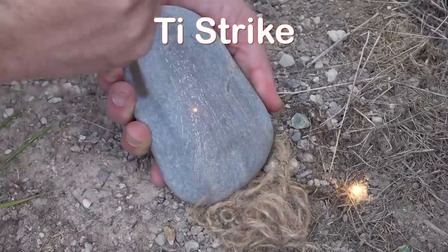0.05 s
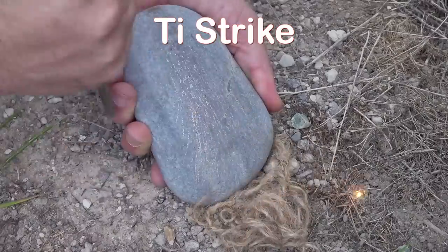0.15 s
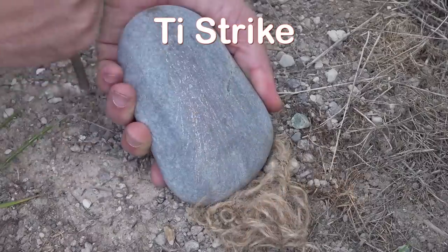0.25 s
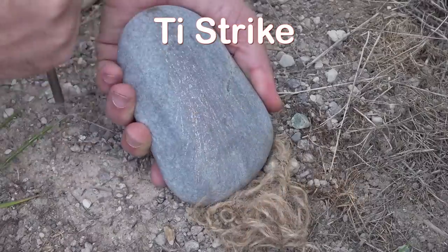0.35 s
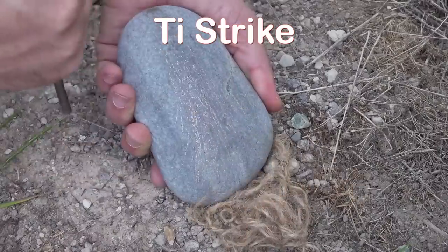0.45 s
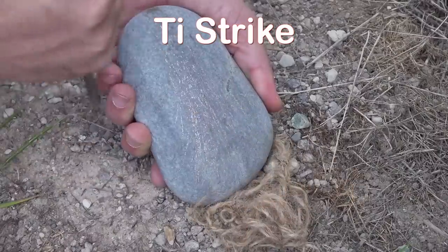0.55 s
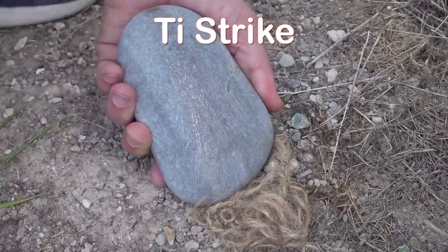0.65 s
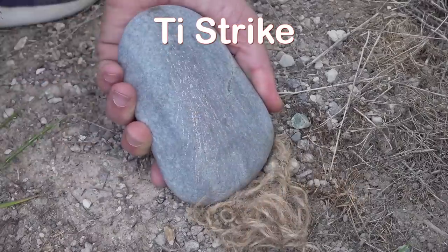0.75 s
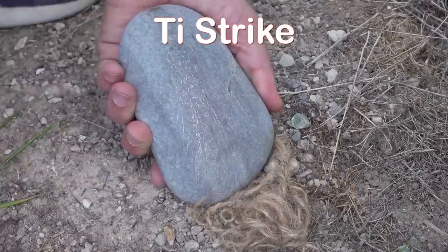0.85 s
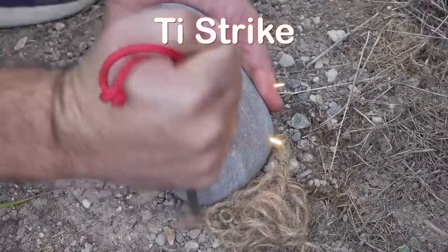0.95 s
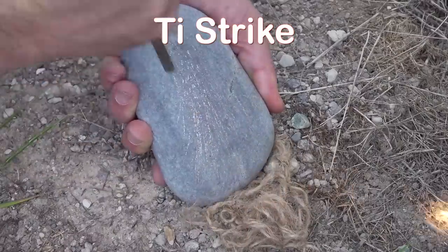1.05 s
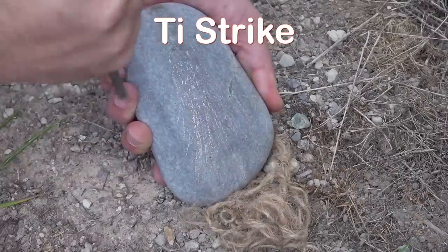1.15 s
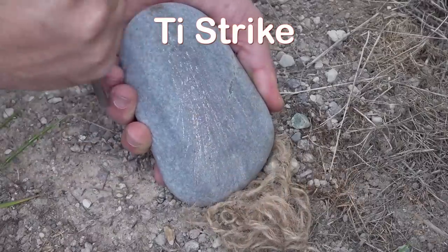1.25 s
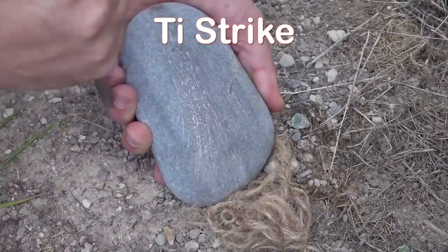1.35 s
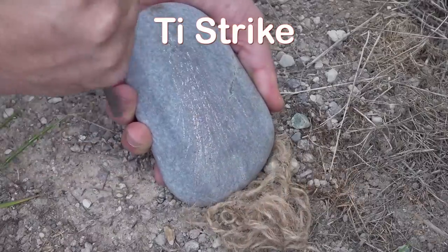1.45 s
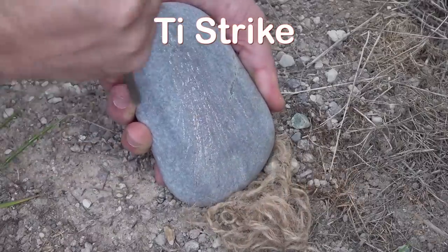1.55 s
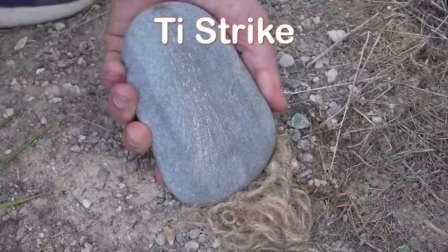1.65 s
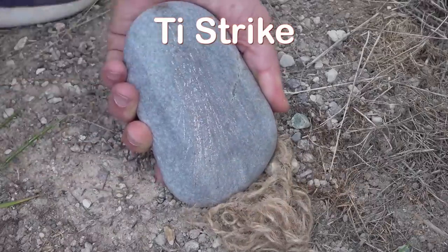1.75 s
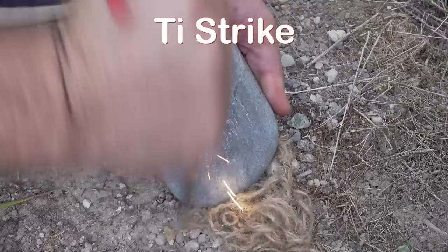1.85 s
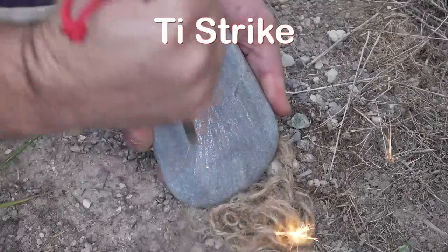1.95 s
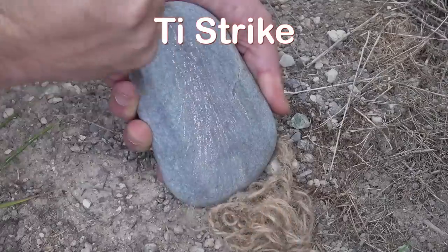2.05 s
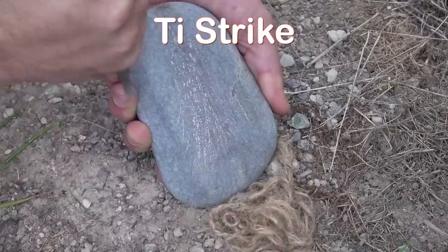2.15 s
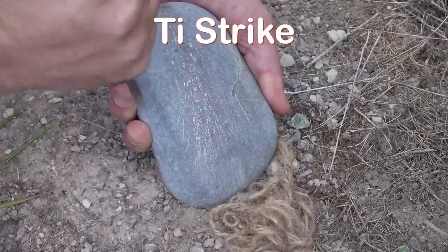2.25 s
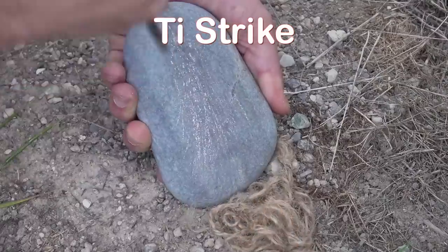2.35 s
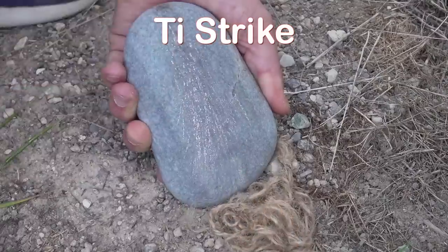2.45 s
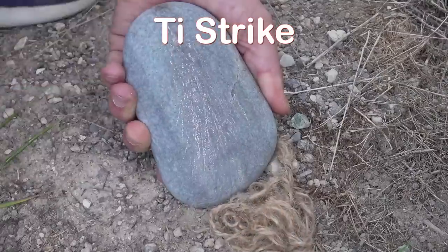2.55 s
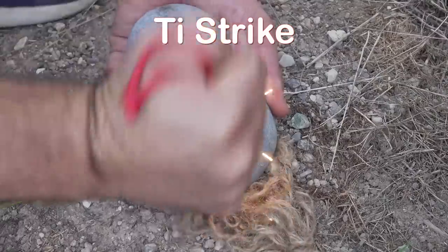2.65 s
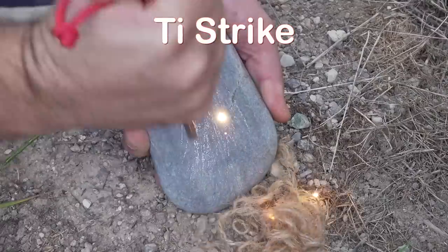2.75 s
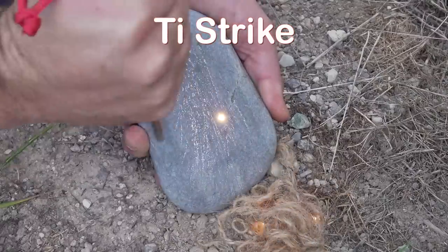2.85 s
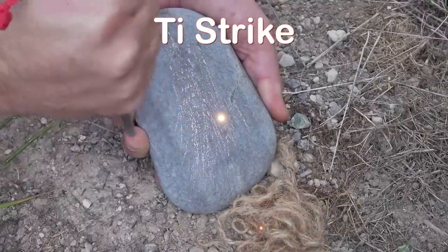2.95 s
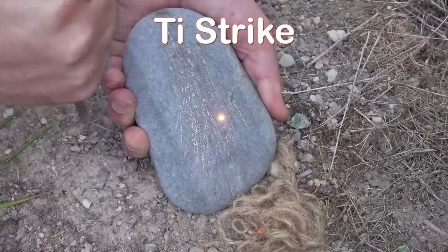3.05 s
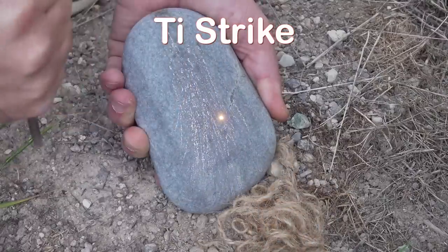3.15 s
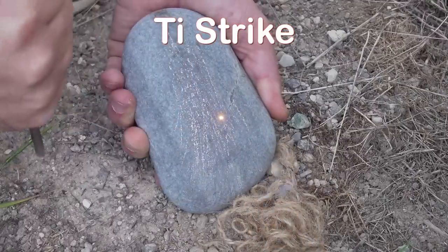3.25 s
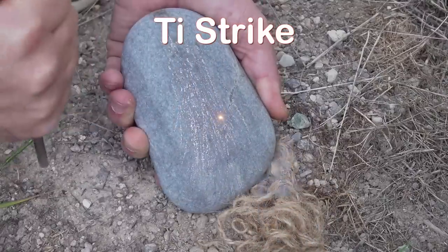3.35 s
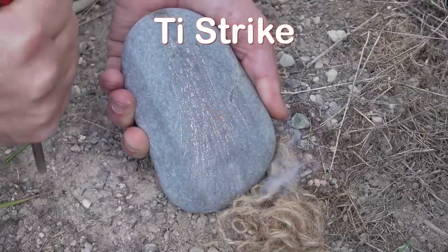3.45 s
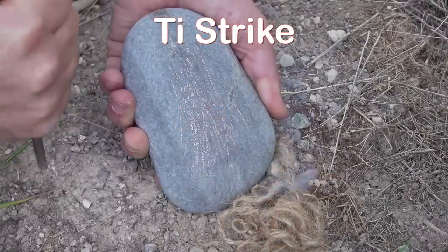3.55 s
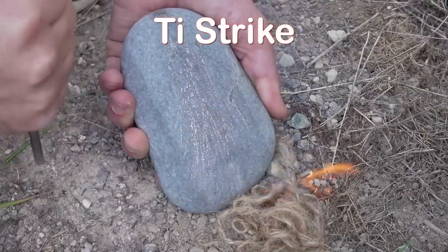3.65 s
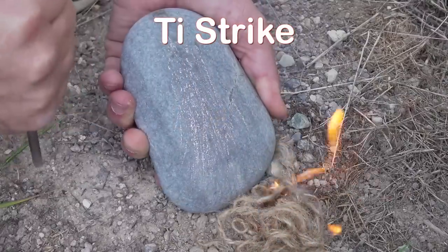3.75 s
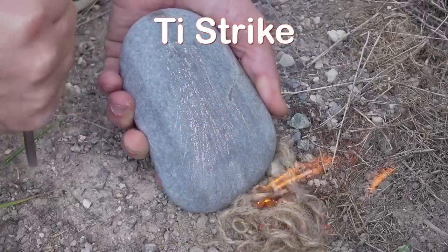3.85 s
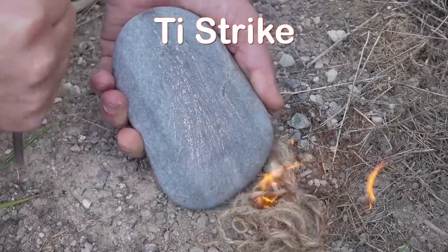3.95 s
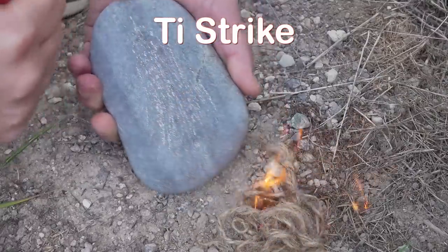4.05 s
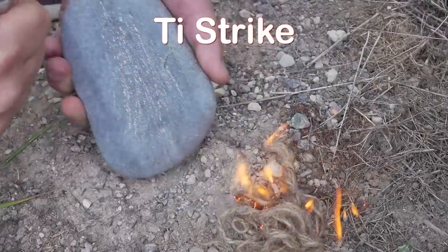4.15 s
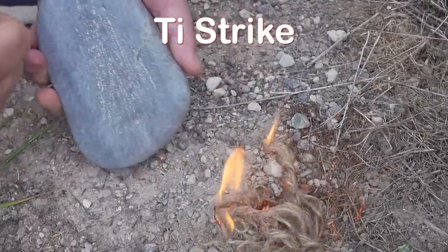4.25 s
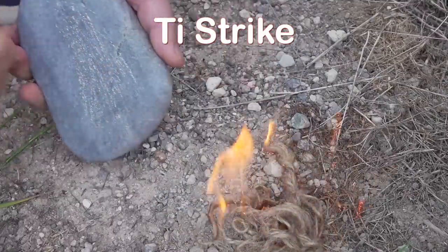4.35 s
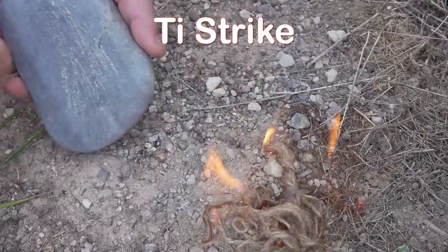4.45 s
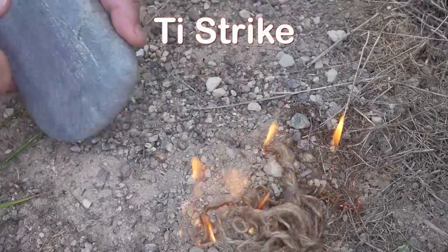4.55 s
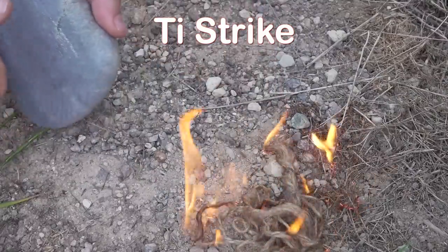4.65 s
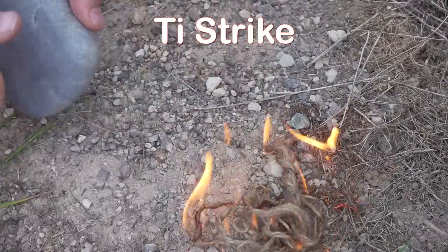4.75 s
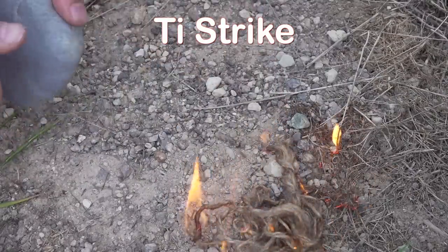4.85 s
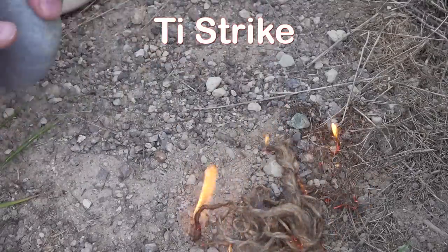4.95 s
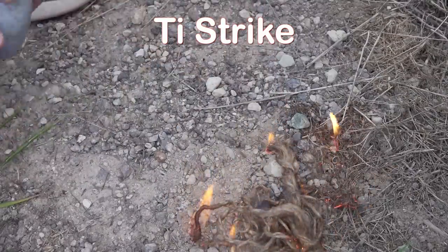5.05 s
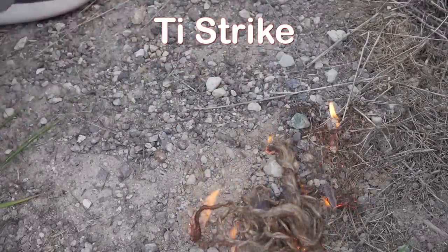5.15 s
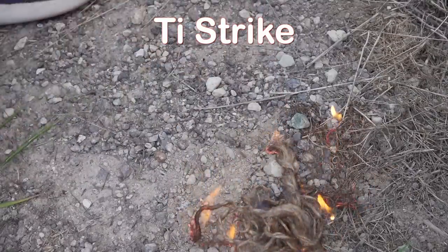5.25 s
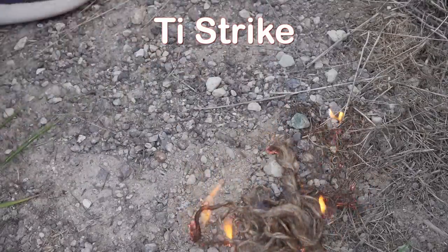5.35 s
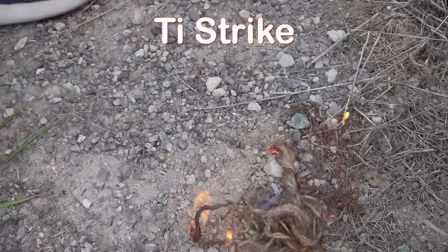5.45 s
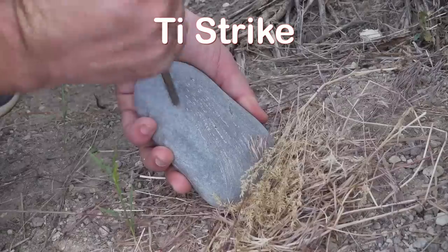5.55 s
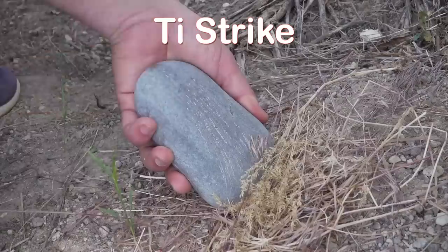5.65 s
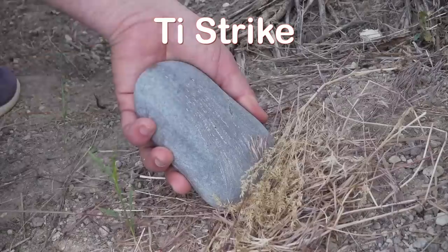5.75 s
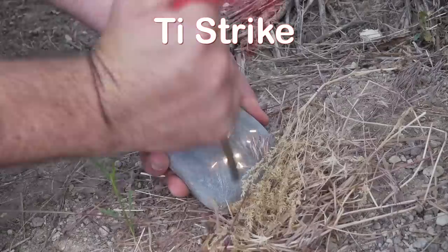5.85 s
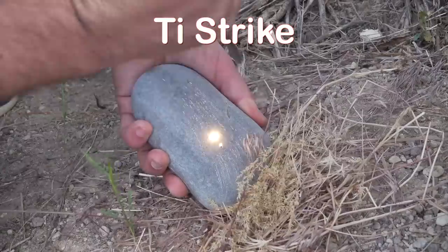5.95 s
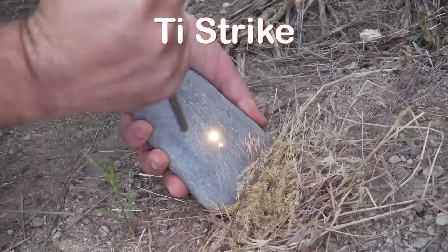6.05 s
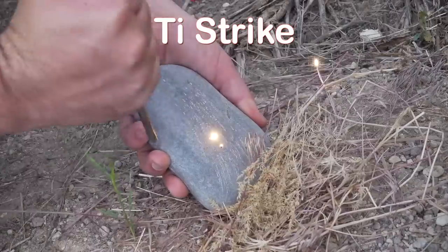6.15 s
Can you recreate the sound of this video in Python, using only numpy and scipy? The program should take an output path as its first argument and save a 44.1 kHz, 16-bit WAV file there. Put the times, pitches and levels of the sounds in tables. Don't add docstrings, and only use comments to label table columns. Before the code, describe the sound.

Close stereo microphone in open air, with faint hiss, a far traffic wash and low wind buffeting. Sharp, dry strikes of metal on stone are much louder than everything else, each fusing into a brief scratch with popping sparks. Between them come cloth rustles, gravel ticks and snapping dry fibre. After the third strike, wind and quiet handling fill a long pause; a distant engine cuts in before a weaker, higher final scrape.

```python
import sys
import numpy as np
from scipy import signal
from scipy.io import wavfile
from scipy.ndimage import uniform_filter1d

SR = 44100
rng = np.random.default_rng(int(sys.argv[2]) if len(sys.argv) > 2 else 0)


def natural_amplitude(level_db):
    exponent = np.asarray(level_db, float) / 20
    return 10 ** exponent


def unload_audio(sound):
    columns = np.transpose(np.atleast_2d(sound))
    steps = np.round(np.clip(columns, -1, 1) * 32767)
    wavfile.write(sys.argv[1], SR, steps.astype(np.int16))


N = 273217
TIME = np.arange(N) / SR


def evened(x):
    return x / np.sqrt(np.mean(x ** 2) + 1e-20)


def read(points, hz):
    f, value = np.transpose(points)
    return np.interp(np.log(hz + 1), np.log(f + 1), value)


def add(mix, start_s, sound):
    part = mix[:, round(start_s * SR):][:, :sound.shape[1]]
    part += sound[:, :part.shape[1]]


def sides(pan_db):
    return natural_amplitude(np.array([.5, -.5])[:, None] * pan_db)


def resonate(x, hz, width_hz):
    turn = np.exp(2j * np.pi * np.cumsum(hz * np.ones(x.shape[-1])) / SR)
    r = np.exp(-np.pi * width_hz / SR)
    return 2 * (turn * signal.lfilter([1 - r], [1, -r], x / turn)).real


# f/Hz, correlation
LIKENESS = [(60, 0.82), (130, 0.86), (290, 0.59), (640, 0.66), (1410, 0.72), (3100, 0.36), (6820, 0.05),
            (15000, -0.98)]


def noise(shape, patchy_db, flicker_db, likeness=1., tilt_db=None, size=512):
    hop, hz = size // 4, np.fft.rfftfreq(size, 1 / SR)
    frames = N // hop + 5
    a, b, c, d, patches = rng.standard_normal((frames, len(hz), 5)).T
    patches = evened(uniform_filter1d(uniform_filter1d(patches, size=8, axis=0), size=16, axis=1))
    flicker = evened(uniform_filter1d(rng.standard_normal(frames), size=3))
    same = np.clip(likeness * read(LIKENESS, hz), -1, 1)[:, None]
    left = a + 1j * b
    z = np.array([left, same * left + np.sqrt(1 - same ** 2) * (c + 1j * d)])
    z *= natural_amplitude(read(shape, hz)[:, None] + patchy_db * patches + flicker_db * flicker)
    z /= np.sqrt(np.mean(abs(z) ** 2))
    if tilt_db is not None:
        octaves = np.log2((hz + 100) / 2500)
        z *= natural_amplitude(np.outer(octaves, np.interp(np.arange(frames) * hop / SR, TIME, tilt_db)))
    return signal.istft(z, nperseg=size, noverlap=size - hop)[1][:, :N] / np.sqrt(size / 3)


BLOW_TIMES = [
    .9464,
    1.8853,
    2.6622,
    5.8893,
]
# peak level/dB, left-right/dB, tuning/factor, treble/dB, middle modes/dB
BLOWS = [
    (-0.5, 0, 1.02, 0.5, -7.5),
    (1.5, 0, 0.978, 0, -0.5),
    (0.5, -0.5, 0.984, 5, -4),
    (-2.5, -0.5, 1.05, -2.5, -7),
]
# level/dB, weak when hit near its node
NODE_DB = [
    0,
    0,
    1,
    -9,
]
# f/Hz, level/dB, t60/s
CLANG = [(1260, -10, 0.010), (1590, -13, 0.012), (2680, -10.5, 0.014), (4940, -4.5, 0.0056),
         (5220, -2, .010), (6003, -2, 0.0073), (7900, -8, 0.0083), (8760, -2.5, 0.006),
         (9950, -3.5, 0.00358), (11650, -12.5, .007), (13300, -13.5, 0.0078)]


def blow(start_s, peak_db, pan_db, tuning, treble_db, middle_db, node_db):
    t = np.arange(1500) / SR
    hz, db, t60_s = np.transpose(CLANG)[..., None]
    hz = hz * tuning * rng.uniform(0.97, 1.02, hz.shape)
    db = db + treble_db * (hz > 7000) + middle_db * (abs(hz - 3500) < 1400)
    db = db + node_db * (abs(hz - 6010) < 300)
    phase = rng.normal(0, 0.77, (2,) + hz.shape) * hz / 9000
    swell = 1 - np.exp(-t * hz / 0.96)
    ring = (swell * natural_amplitude(db - 60 * t / t60_s) * np.sin(2 * np.pi * hz * t + phase)).sum(1)
    contact = np.zeros(90)
    contact[[0, 9, 37, 62, 85]] = .25, .9, .25, -.25, .12
    clang = signal.fftconvolve(ring, contact[None], axes=1)
    return start_s, natural_amplitude(peak_db - 0.5) * sides(pan_db) * clang / abs(clang.mean(0)).max()


# landing pressure/dB, deepest bite t/s, bite pressure/dB, lift-off/(dB/s), treble/dB
STROKES = [
    (-30, 0.016, -21, 900, 4),
    (-22, .018, -20, 900, -1.5),
    (-27, 0.021, -21.5, 1300, -0.5),
    (-26.5, 0.023, -30.5, 1500, -7),
]
# factor before bite, at bite, lifting; low modes/dB; stone tuning/factor
GRIPS = [
    (1.03, 1.1, 1, -0.5, 1.05),
    (1.03, 1.1, 1.15, 2.5, 0.997),
    (1.06, 1.02, 1.075, 0.5, 1.096),
    (1.02, 0.95, 1.06, 2.5, 1.02),
]
# f/Hz, width/Hz, level/dB
ROD = [(3183, 800, -16.5), (4100, 560, -14.5), (4900, 490, -5.5), (5280, 200, -5), (5900, 250, -6),
       (6500, 1000, -6.5), (7250, 300, -10.5), (8400, 410, -7), (10700, 1600, -9.5), (12800, 1200, -16)]
# f/Hz, width/Hz, level/dB
STONE = [(253, 290, -26.5), (680, 210, -21), (1200, 250, -11.5), (1605, 250, -10.5), (2200, 1200, -13)]
STROKE_S, REBOUND_DB_PER_S, DIG_DB_PER_S, DUST_DB = .064, 900.5, 651.5, -60
ROUND_S, LIFT_ROUND_S, LIFT_STEEP = .0048, .014, 1.41
THUD_DB, STONE_FULL_DB, STONE_SQUEEZE = 4.5, -24.5, 1.7
DULLING_DB, BLUR = 5.5, .5


def stroke(start_s, row, grip, pan_db):
    landing_db, bite_s, bite_db, lift_db_per_s, treble_db = row
    t = np.arange(0, STROKE_S, 1 / SR)
    knee_s = np.where(t < bite_s, ROUND_S, LIFT_ROUND_S)
    away_s = np.hypot(t - bite_s, knee_s) - knee_s
    dig_db = bite_db - away_s * np.where(t < bite_s, DIG_DB_PER_S, LIFT_STEEP * lift_db_per_s)
    pressure = natural_amplitude(landing_db - REBOUND_DB_PER_S * t) + natural_amplitude(dig_db) + natural_amplitude(DUST_DB - 150 * t)
    squeeze_db = STONE_SQUEEZE * np.maximum(20 * np.log10(pressure) - STONE_FULL_DB, 0)
    thud_db = THUD_DB - squeeze_db + DULLING_DB * (t / STROKE_S) ** 3
    tuning = np.interp(t, bite_s + np.array([-.009, 0, .012]), grip[:3])
    blur = BLUR * np.clip((t - bite_s) / .015, 0, 1)

    count = len(ROD + STONE)
    skips = natural_amplitude(1.5 * evened(uniform_filter1d(rng.standard_normal(3000), size=80)))
    mode_skips = natural_amplitude(3.0 * evened(uniform_filter1d(rng.standard_normal((count, 1, 3000)), size=180)))
    grit = skips * mode_skips * rng.standard_normal((count, 3, 3000)) * (rng.random(3000) < .3)

    modes = []
    for hz, width_hz, db in ROD:
        mode_db = db - blur * (db + 10.0) + treble_db * (hz > 7000) + grip[3] * (hz < 5000)
        modes.append((hz * tuning, width_hz, mode_db, hz / 9000))
    for hz, width_hz, db in STONE:
        modes.append((hz * grip[4], width_hz, db + thud_db, .1))
    parts = []
    for g, (hz, width_hz, db, apart) in zip(grit[..., :len(t)], modes):
        ring = resonate(resonate(g[0] + apart * g[1:], hz, width_hz), hz, 4 * width_hz)
        parts.append(natural_amplitude(db) * ring / np.sqrt(width_hz))
    rod_rms = np.sqrt(np.mean(sum(parts[:len(ROD)]) ** 2))
    fade = np.minimum(1, np.minimum(t, STROKE_S - t) / .002)
    return start_s, pressure * fade * sides(pan_db) * sum(parts) / rod_rms


# t/s, length/s, peak level/dB, f/Hz, glide/share of f
SINGS = [(0.949, 0.0075, -17, 5330, -0.0046), (0.956, .016, -15, 5200, 0.065),
         (.972, 0.011, -25, 6260, .02), (.955, .018, -24.5, 8750, -0.043), (.949, .008, -22, 1250, 0),
         (0.953, 0.017, -28.5, 1600, 0.0084), (.9745, .004, -26.5, 10150, 0.0034),
         (1.893, .014, -15, 4856, .15), (1.893, .008, -17, 6000, 0), (1.894, 0.0078, -26.5, 1350, -0.0053),
         (1.909, .004, -25.5, 3800, 0), (1.91, 0.013, -25.5, 6310, 0.048), (1.914, .006, -28, 1100, 0),
         (2.669, .018, -22, 6050, -.02), (2.683, .007, -15, 4950, .08), (2.683, .007, -17, 7500, 0),
         (2.676, .006, -21, 5400, 0), (2.6622, .004, -15, 8200, -0.0049), (2.668, .016, -24, 1646, 0.047),
         (2.687, 0.011, -31.5, 1665, -0.051), (2.688, 0.0074, -26, 6020, 0.047),
         (5.8904, 0.003, -15, 7900, 0.087), (5.902, 0.011, -25, 5200, -0.062), (5.908, 0.012, -24, 1580, 0),
         (5.899, .018, -27, 1230, 0), (5.919, 0.0051, -33, 6350, 0), (5.897, 0.0044, -28, 8000, 0.016),
         (5.902, .006, -30, 8000, 0), (5.906, .006, -29, 3120, 0), (5.914, .004, -32, 2920, 0)]
# t/s, length/s, peak level/dB, f/Hz, glide/share of
BUMPS = [(2.770, .045, -45, 270, -.15), (2.758, .009, -44, 1150, 0), (2.918, .03, -37, 77, 0),
         (1.066, .025, -49, 1450, .2), (1.219, .008, -35, 1700, -.05), (2.793, .014, -44, 725, 0),
         (2.890, .046, -32.5, 44.6, 0), (2.951, .012, -41, 950, .15), (2.952, .009, -44, 1600, 0),
         (2.959, .010, -41, 650, 0), (4.250, .020, -41, 338, 0), (4.251, .016, -44, 800, 0),
         (3.656, .018, -42, 560, 0), (4.639, 0.027, -43.5, 111, -.2), (4.447, 0.025, -43.5, 60, 0)]
CHATTER_SHARE, UNEVEN_DB = .035, 3.


def sing(start_s, length_s, peak_db, hz, glide):
    t = np.arange(0, length_s, 1 / SR)
    drift = uniform_filter1d(rng.standard_normal((3, 2500)), size=40) * np.sqrt(40)
    wander, lumps, apart = drift[:, :len(t)]
    pitch_hz = hz * (1 + glide * (t / length_s - .5) + CHATTER_SHARE * wander)
    angle = 2 * np.pi * np.cumsum(pitch_hz) / SR
    ports = np.array([.5, -.5])[:, None] * apart * hz / 12000
    level = natural_amplitude(peak_db + UNEVEN_DB * lumps * min(hz / 2000, 1))
    return start_s, level * np.sin(np.pi * t / length_s) * np.sin(angle + ports)


POP_TIMES = [.0082, .0331, .0571, .0817, .0846, .0874, .9918, 1.0338, 1.0979, 1.9313, 2.0055, 2.0135,
             2.7116, 2.7183, 2.9493, 2.9644, 4.1487, 5.9673]
# needle level/dB, push level/dB, push f/Hz, scatter level/dB
POPS = [(-15, -21, 1300, -36), (-43, -23.5, 930, -36), (-50, -38, 1300, -53), (-50, -23.5, 1300, -60),
        (-46, -25, 1100, -58), (-55, -42, 1200, -59), (-23, -37, 1200, -43), (-13.5, -35.5, 5500, -26),
        (-8, -21, 1000, -23), (-32, -31, 1700, -44), (-13, -22, 710, -24), (-15.5, -38, 1300, -47),
        (-34, -21, 2700, -38), (-29, -21, 2400, -31), (-17, -23.5, 800, -33), (-29, -32, 1500, -53),
        (-30.5, -28.5, 8100, -45), (-35, -19, 1400, -30.5)]


def pop(start_s, spike_db, swing_db, swing_hz, scatter_db, pan_db):
    lead_s = 30 / SR
    t = np.arange(700) / SR - lead_s
    spike = (1 - 1.3 * (t * 21000) ** 2) * np.exp(-(t * 21000) ** 2)
    u = t * swing_hz + .2
    swing = 1.31 * np.sin(2 * np.pi * u) * np.exp(-((u - .5) / 0.31) ** 2)
    front = natural_amplitude(spike_db) * spike + natural_amplitude(swing_db) * swing
    echoes = natural_amplitude(-23.5) * np.roll(front, 58) + natural_amplitude(-20.0) * np.roll(front, 104)
    echoes = echoes + natural_amplitude(-23.0) * np.roll(front, 255)
    grit = rng.standard_normal((3, len(t)))
    scatter = resonate(resonate(grit[0] + 0.83 * grit[1:], 8300, 7000), 5900, 9910)
    scatter = scatter * natural_amplitude(scatter_db - 5.0 - 60 * t / 0.011) * (t > 0)
    ground = evened(resonate(resonate(grit[0, ::-1], 1200, 1400), 1200, 1400))
    ground = ground * natural_amplitude(swing_db - 14.0 - 60 * t / 0.022) * (t > 0)
    return start_s - lead_s, sides(pan_db) * (front + echoes + scatter + ground)


# t/s, peak level/dB, f/Hz, left-right/dB
GRAVEL = [(.091, -38, 1200, 4), (.096, -37, 1300, 6), (.108, -37, 1300, -2), (.120, -35, 1260, 6),
          (.145, -44, 1300, 0), (.168, -44, 900, 0), (1.004, -38, 1100, 1), (1.911, -28.5, 291, 1),
          (2.761, -41, 1590, -0.5), (2.771, -31.5, 1150, 2), (2.78, -39.5, 221, 3), (2.794, -35, 885, -1),
          (2.826, -42, 1300, 0), (2.85, -49, 900, 0), (2.893, -48, 500, 0), (3.681, -42, 800, -0.5),
          (3.69, -45, 1000, 0), (3.645, -46, 600, 0), (3.731, -45, 420, 0.5), (1.199, -42, 1500, 0),
          (3.989, -43, 480, 1.5), (4.252, -38, 500, 0), (5.126, -38.5, 2200, 0), (5.516, -40, 903, 4)]
# t/s, peak level/dB, f/Hz, left-right/dB
FIBRE = [(1.025, -57, 7000, 0), (1.218, -27, 5100, 4), (2.098, -37.5, 5460, -.5), (2.245, -44.5, 3960, 0),
         (2.825, -37.5, 3510, 7), (3.657, -45, 4520, -2), (3.804, -47, 5500, 4), (3.871, -48, 6000, -3.5),
         (4.255, -48, 3500, 4), (5.654, -46, 6500, 4)]
# t/s, peak level/dB, f/Hz, left-right/dB, width/share of f
PEBBLES = [(.133, -52, 4800, -2, .1), (.886, -48.5, 4500, 6, .45), (1.068, -42, 1450, 3, .35),
           (1.2188, -32, 1620, 1, 0.23), (1.22, -44, 10380, -2, 0.029), (2.098, -38, 14000, -6, .18),
           (2.774, -40, 5500, 0, 0.14), (2.8, -45, 5500, 2, .11), (3.657, -30.5, 980, -.4, 0.62),
           (3.658, -39, 2050, 2.5, 0.48), (3.664, -34.5, 830, -1.1, 0.83), (3.665, -41, 2090, -2, 0.17),
           (5.609, -39.5, 6350, 3.5, 0.4), (5.687, -44.5, 3320, 2, .21), (5.699, -42, 3800, -14, 0.27),
           (5.761, -45.5, 1200, -3, 0.13)]


def tick(start_s, peak_db, hz, pan_db, width_share, crunch_s, cycles):
    t = np.arange(3000) / SR
    decay_s, width_hz = crunch_s + cycles / hz, width_share * hz
    grains = rng.standard_normal((3, len(t))) * np.exp(-t / decay_s) * (t < 2.5 * decay_s)
    ring = resonate(resonate(grains[0] + hz / 15000 * grains[1:], hz, width_hz), hz, 1.14 * width_hz)
    return start_s, natural_amplitude(peak_db) * sides(pan_db) * ring / abs(ring).max()


# t/s, length/s, level/dB, f/Hz, width/Hz
RUBS = [
    (2.6, 0.13, -52, 1300, 810),
    (2.755, 0.045, -52.5, 1240, 620),
    (3.45, 0.33, -65, 217, 120),
    (4.35, 0.55, -65, 1870, 140),
    (4.85, 0.59, -67, 220, 30),
    (5.92, .035, -50, 5000, 3000),
    (4.3, .35, -62, 1180, 200),
]


def rub(start_s, length_s, db, hz, width_hz):
    t = np.arange(0, length_s, 1 / SR)
    a, b, lumps = rng.standard_normal((3, SR))
    lumps = natural_amplitude(3.3 * evened(uniform_filter1d(lumps, size=500)))
    ports = np.array([a + 0.24 * b, a - 0.24 * b])[:, :len(t)]
    ring = resonate(resonate(ports, hz, width_hz), hz, width_hz)
    return start_s, natural_amplitude(db) * np.sin(np.pi * t / length_s) * lumps[:len(t)] * evened(ring)


# t/s, length/s, level/dB, brightness/(dB/octave)
RUSTLES = [(-.1, 0.22, -54.5, 1.3), (0.034, 0.42, -61.5, 1.5), (0.553, 0.14, -69.5, 0.5),
           (0.977, 0.32, -58.5, 1.8), (1.903, 0.29, -59.5, 2.5), (2.154, 0.23, -68, 1),
           (2.675, 0.22, -57, 3.5), (2.846, 0.41, -56.5, 1.3), (3.196, 0.59, -75, -2.5),
           (3.626, 0.46, -68.5, -2), (3.896, 1.14, -56, 1.46), (4.838, 0.59, -57.5, 3),
           (5.294, 0.63, -67.5, 3.5), (5.852, 0.23, -57, 2.5), (6.028, 0.2, -54.5, 1)]
# f/Hz, density/dB
RUSTLE = [(88, -32.5), (150, -1), (219, -2.5), (265, -10.5), (314, -16.5), (352, -1.5), (647, -6.5),
          (1160, -1.5), (1640, -8), (1910, -5.5), (2100, -8), (3310, -9), (10900, -20.5), (14000, -28.5)]
CALM_DB, CALM_TILT_DB, RISE_SHARE, FALL_SHARE = -68, -3, 0.25, 0.3


def rustle():
    t = TIME[::64]
    level = natural_amplitude(CALM_DB)
    tilted = natural_amplitude(CALM_DB) * CALM_TILT_DB
    for start_s, length_s, db, bright_db in RUSTLES:
        ramps = np.minimum((t - start_s) / RISE_SHARE, (start_s + length_s - t) / FALL_SHARE)
        move = natural_amplitude(db) * np.clip(ramps / length_s, 0, 1)
        level = level + move
        tilted = tilted + move * bright_db
    tilt_db = np.interp(TIME, t, tilted / level)
    return np.interp(TIME, t, level) * natural_amplitude(6.0) * noise(RUSTLE, 1.0, 0.79, 1.38, tilt_db)


# t/s, level/dB, half width/s
GUSTS = [(.22, -52, 0.19), (.45, -57, .07), (.85, -62, 0.039), (1.28, -70, 0.079), (1.52, -57, 0.21),
         (1.76, -56, 0.084), (2.13, -63, 0.073), (2.45, -54, 0.094), (2.721, -49, 0.045),
         (2.917, -48, 0.054), (3.085, -46, 0.046), (3.22, -41.5, 0.1), (3.62, -48, 0.064),
         (3.789, -46.5, 0.077), (4.0, -50.5, 0.084), (4.25, -40, 0.16), (4.7, -54, 0.19),
         (5.099, -43.5, 0.097), (5.34, -42.5, 0.11), (2.57, -51, 0.071), (3.5, -55, .05), (.33, -46, 0.042),
         (5.94, -50, 0.026)]
# f/Hz, density/dB
WIND = [(8.8, -27), (15, 2), (28, 2), (71, -5.5), (155, -22), (183, -25.5), (219, -24), (400, -32),
        (520, -36.5), (880, -120)]
LULL_DB, GUST_PAN_DB, LEE_SHARE = -62.5, -3, 0.16


def wind():
    t = TIME[::64]
    gust = natural_amplitude(LULL_DB) + sum(natural_amplitude(db) * np.exp(-((t - s) / half_s) ** 2) for s, db, half_s in GUSTS)
    pan_db = GUST_PAN_DB + LEE_SHARE * np.minimum(20 * np.log10(gust) + 44, 0)
    gust, pan_db = np.interp(TIME, t, gust), np.interp(TIME, t, pan_db)
    return gust * natural_amplitude(3.0) * sides(pan_db) * noise(WIND, 3.05, 2.1, 1.05, size=2048)


# t/s, firing f/Hz, load level/dB, shift from low orders to fourth/dB
ENGINE = [
    (5.51, 40.87, -47, -7.5),
    (5.55, 41, -43, -3.5),
    (5.7, 41.48, -46, -0.5),
    (5.755, 41.57, -50.5, 6.5),
    (5.8, 40.53, -42, 3),
    (5.88, 40.7, -45, 2),
    (5.99, 37.2, -47, -1),
    (6.125, 37.8, -51, 1.5),
    (6.195, 37.4, -45, 2),
]
ORDERS_DB = [-1.5, 2, -0.5]
# order, level re OVERTONES_DB/dB
OVERTONES = [(1, -27), (5, -11.5), (6, -14), (7, -15.5), (8, -26), (9, -17.5), (10, -19), (11, -15.5)]
# f/Hz, density/dB
ROAR = [(140, -25), (230, -1), (279, 1.5), (317, -16), (458, -15), (674, -13), (1190, -11.5), (3000, -33),
        (3900, -62), (6600, -120)]
ROAR_DB, OVERTONES_DB = -48.5, -47.0


def waver():
    return evened(uniform_filter1d(uniform_filter1d(rng.standard_normal(N), size=1300), size=1300))


def engine():
    s, *columns = np.transpose(ENGINE)
    hz, load_db, shift_db = (np.interp(TIME, s, c) for c in columns)
    levels_db = load_db + np.array(ORDERS_DB)[:, None] + np.outer([-1, -1, 1], shift_db)
    wobble = 0.0048 * evened(uniform_filter1d(rng.standard_normal(N), size=2500))
    turns = np.cumsum(hz * (1 + wobble)) / SR

    def order(k):
        return np.cos(2 * np.pi * (k * turns + rng.random()))

    low = sum(natural_amplitude(db) * order(k) for k, db in zip((2, 3, 4), levels_db))
    high = natural_amplitude(OVERTONES_DB) * sum(natural_amplitude(db) * waver() * order(k) for k, db in OVERTONES)
    throb = 1 + 0.078 * np.cos(2 * np.pi * turns)
    roar = natural_amplitude(ROAR_DB) * noise(ROAR, 1.2, 0.74, 1.37, size=1024) * throb
    onset = np.clip((TIME - s[0]) / 0.011, 0, 1)
    return onset * sides(-3.0) * (np.sqrt(2) * (low + high) + roar)


# t/s, level/dB, f/Hz
CHIRP = [
    (5.8, -68, 3440),
    (5.81, -63, 3660),
    (5.825, -64.5, 3650),
    (5.836, -59, 3400),
    (5.841, -68, 3110),
]


def bird():
    s, db, hz = np.transpose(CHIRP)
    t = np.arange(s[0], s[-1], 1 / SR)
    whistle = natural_amplitude(np.interp(t, s, db)) * np.sin(2 * np.pi * np.cumsum(np.interp(t, s, hz)) / SR)
    return s[0], np.sqrt(2) * sides(-1.8) * whistle


# f/Hz, density/dB
WASH = [(35, -35), (60, -6.5), (128, -7.5), (151, -29.5), (227, -18), (335, -22.5), (396, -18),
        (513, -27.5), (653, -21), (911, -24.5), (1980, -32.5), (2430, -37), (5000, -41), (6500, -67),
        (11000, -120)]
WASH_DB = -55.5


def wash():
    return natural_amplitude(WASH_DB) * noise(WASH, 2.0, 0.61, 0.73, size=1024)


# f/Hz, density/dB
HISS = [(1180, -26), (2000, -4), (2430, -15.5), (3480, -11), (5550, -9.5), (15100, -9), (16400, -20.5)]
HISS_DB = -59.5


def hiss():
    return natural_amplitude(HISS_DB) * noise(HISS, .5, .3, 0.12)


def scene():
    mix = rustle() + wind() + engine() + wash() + hiss()
    for s, hit, node_db, row, grip in zip(BLOW_TIMES, BLOWS, NODE_DB, STROKES, GRIPS):
        add(mix, *blow(s, *hit, node_db))
        add(mix, *stroke(s, row, grip, pan_db=hit[1]))
    for row in SINGS + BUMPS:
        add(mix, *sing(*row))
    for s, row in zip(POP_TIMES, POPS):
        add(mix, *pop(s, *row, pan_db=-0.4))
    for row in GRAVEL:
        add(mix, *tick(*row, width_share=1.7, crunch_s=0.00022, cycles=3.63))
    for row in FIBRE:
        add(mix, *tick(*row, width_share=1.25, crunch_s=0.0017, cycles=2.5))
    for row in PEBBLES:
        add(mix, *tick(*row, crunch_s=0.0018, cycles=1.8))
    for row in RUBS:
        add(mix, *rub(*row))
    add(mix, *bird())
    return mix


def top_cut(x):
    return signal.sosfilt(signal.butter(12, 15950, fs=SR, output="sos"), x)


def record(dry):
    lowpass = signal.firwin(255, 16300, window=("kaiser", 8), fs=SR)
    limited = signal.oaconvolve(dry, lowpass[None], "same")
    return top_cut(np.clip(limited, -.9, .9))


dry = scene()
out = record(dry)
unload_audio(out)
```